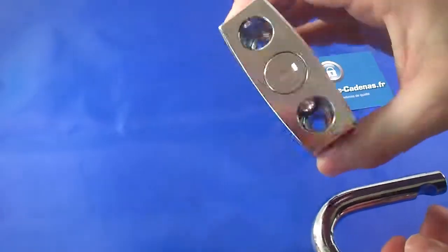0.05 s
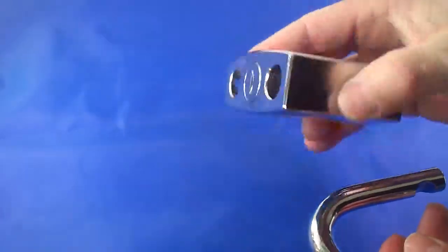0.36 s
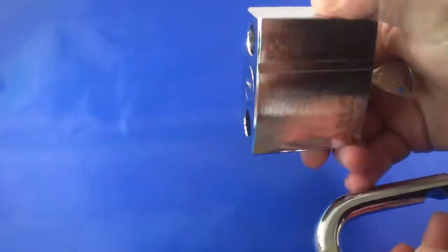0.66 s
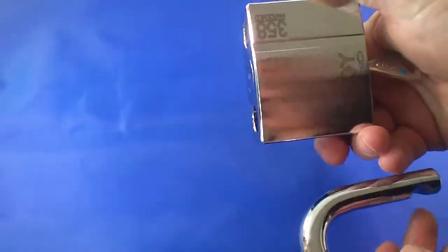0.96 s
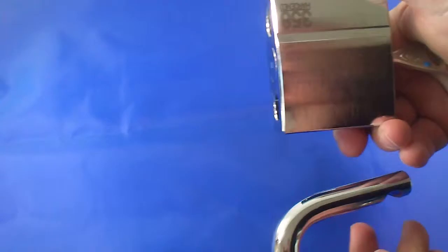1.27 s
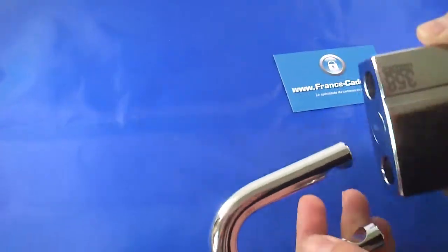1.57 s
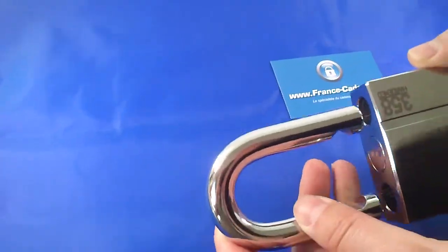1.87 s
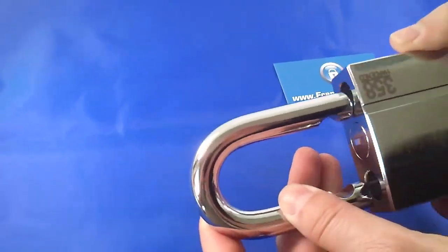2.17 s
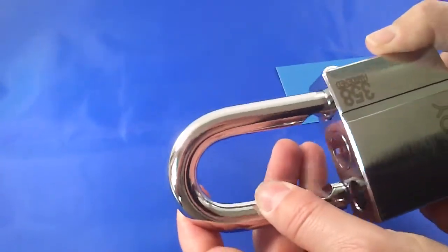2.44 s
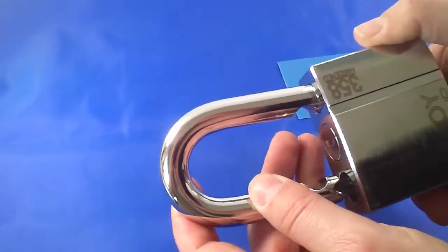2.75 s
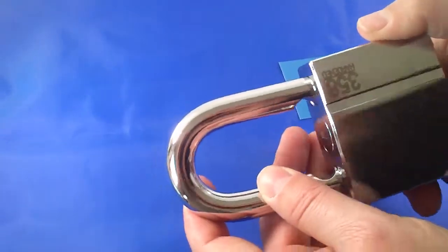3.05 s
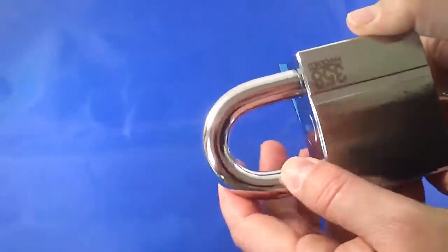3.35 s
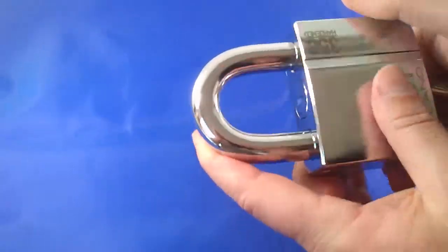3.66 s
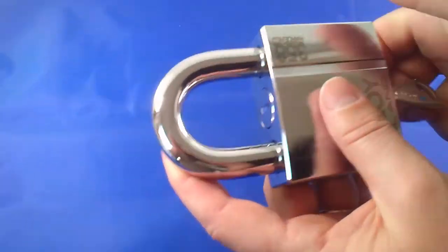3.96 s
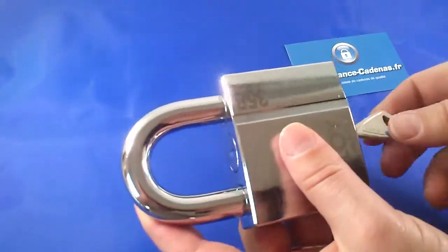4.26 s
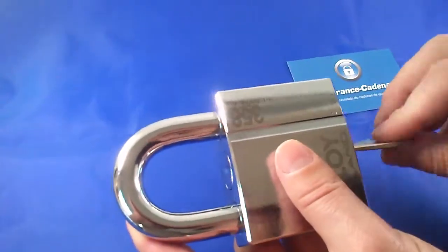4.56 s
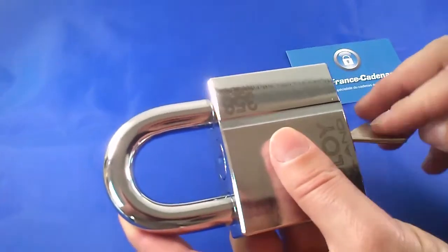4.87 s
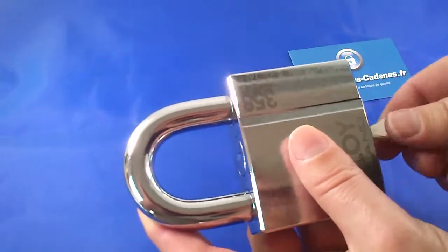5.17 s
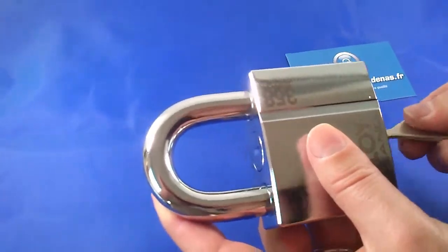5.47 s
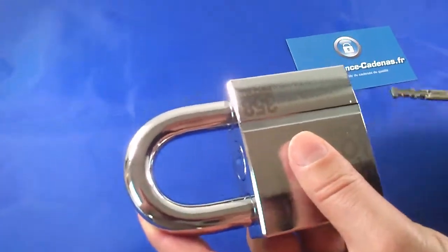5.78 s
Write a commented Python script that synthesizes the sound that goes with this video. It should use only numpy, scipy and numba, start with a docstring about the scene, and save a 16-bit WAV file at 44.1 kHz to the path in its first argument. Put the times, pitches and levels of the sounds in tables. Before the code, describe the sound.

A steel padlock clinks and grinds as its shackle snaps loudly shut, then a key scrapes faintly in the lock.

```python
"""A heavy steel padlock is handled close to a stereo microphone in a small room with faint hiss and hum.
Hands bump softly and the loose works tick. From 2 s the shackle clinks on the body, grinds into
its holes and, at 3.4 s, snaps home. The snap overloads the recorder, whose gain then creeps back.
From 4 s a key scrapes and taps in the keyway and rings thinly as it is drawn out."""
import sys
import numpy as np
from scipy import signal
from scipy.fft import rfft, irfft
from scipy.io import wavfile
from numba import njit

SR = 44100
rng = np.random.default_rng(int(sys.argv[2]) if len(sys.argv) > 2 else 0)


def log_audio(samples):
    """Write samples as a 16-bit WAV file to the path given in sys.argv[1]."""
    # one column per channel
    frames = np.atleast_2d(samples).T
    # limit to full scale, then quantise
    limited = np.clip(frames, -1, 1)
    pcm = np.round(limited * 32767).astype(np.int16)
    wavfile.write(sys.argv[1], SR, pcm)


N = 256662
TIME_S = np.arange(N) / SR
SHORT_S = TIME_S[:SR // 2]

# steel-on-steel grinding spectrum: freq_hz, relative_db
GRIND_SPECTRUM = [(300, -44.5), (900, -35), (1400, -10), (2200, -4.5), (2700, -5.5), (4900, 7.5),
                  (6800, -8.5), (8500, 2.5), (9600, -25.5), (10500, -15), (11600, -33), (13000, -6.5),
                  (14400, -14), (16000, -38)]
# shackle stage boundaries: free_until_s, seated_after_s
STAGE_EDGES_S = [2.15, 3]


def undb(db):
    """Decibels to gain."""
    return 10 ** (np.asarray(db) / 20)


def unit(x):
    """Scale to rms 1."""
    return x / np.sqrt(np.mean(x ** 2))


def fade(time_s, t60_s):
    """Exponential decay."""
    return np.exp(-np.log(1000) * time_s / t60_s)


def add(track, start_s, sound):
    """Mix a sound into the track."""
    start = int(start_s * SR)
    track[start:start + len(sound)] += sound[:N - start]


def colour(x, spectrum, tilt_db_oct=0, size=4096):
    """Minimum-phase filter through (freq_hz, gain_db) points, tilted above 2 kHz."""
    octave = np.log2(np.maximum(np.fft.rfftfreq(size, 1 / SR), 1))
    freq_hz, gain_db = np.transpose(spectrum)
    tilt_db = tilt_db_oct * np.clip(octave - np.log2(2000), 0, None)
    cepstrum = irfft(np.log(undb(np.interp(octave, np.log2(freq_hz), gain_db) + tilt_db)))
    cepstrum[1:size // 2] *= 2
    cepstrum[size // 2 + 1:] = 0
    return signal.oaconvolve(x, irfft(np.exp(rfft(cepstrum))))[:len(x)]


def noise(spectrum, size):
    """Coloured noise, rms 1."""
    return unit(colour(rng.standard_normal(size), spectrum))


def crack(spectrum, t60_s, tilt_db_oct=0, size=2048):
    """Dense, heavily damped contact modes: a noise burst starting near rms 1."""
    envelope = fade(TIME_S[:size], t60_s)
    burst = colour(rng.standard_normal(size) * envelope, spectrum, tilt_db_oct)
    return burst * np.linalg.norm(envelope) / np.linalg.norm(burst)


def ring(modes, tilt_db_oct=0, scatter_db=0.1):
    """Decaying modes starting near rms 1; each contact weights them slightly differently."""
    pitch_hz, mode_db, t60_s = np.transpose(modes)
    gain = undb(mode_db + tilt_db_oct * np.log2(pitch_hz) + scatter_db * rng.standard_normal(len(modes)))
    phase = 2 * np.pi * (pitch_hz[:, None] * SHORT_S + rng.random((len(modes), 1)))
    attack = 1 - np.exp(-SHORT_S / .0002)
    waves = np.sin(phase) * fade(SHORT_S, t60_s[:, None]) * attack
    return np.sqrt(2) * gain @ waves / np.linalg.norm(gain)


def slips(length_s, rate_hz, spread_db, sag_db=0, crowding=1):
    """Force of uneven tiny blows that weaken by sag_db; crowding over 1 speeds them up as they go."""
    force = np.zeros(max(int(length_s * SR), 2))
    count = int(length_s * rate_hz) + 2
    jitter, size_db = rng.random(512)[:count], spread_db * rng.standard_normal(512)[:count]
    progress = ((np.arange(count) + jitter) / count) ** (1 / crowding)
    force[(progress * len(force)).astype(int)] = undb(size_db - sag_db * progress)
    return force


def stroke(length_s, swell_db, rate_hz, spread_db, crest_share=.7, ease_db=5):
    """Stick-slip force of a hand push: swells to a crest, then eases."""
    force = slips(length_s, rate_hz, spread_db)
    progress = np.linspace(0, 1, len(force))
    return force * undb(np.interp(progress, [0, crest_share, 1], [-swell_db, 0, -ease_db]))


def rub(force, response):
    """Resonator driven by a force; energy equals rms 1 over the force's length."""
    sound = signal.fftconvolve(force, response)
    return sound * np.sqrt(len(force)) / np.linalg.norm(sound)


def background(hiss_db=(-52, -59), hum_hz=196, hum_db=-64):
    """Steady hiss, partly common to both sides, and a faint wavering hum."""
    # hiss spectrum: freq_hz, relative_db
    hiss_spectrum = [(15, -23), (25, 2.5), (126, -15), (198, -13.5), (227, -19), (359, -23.5), (631, -23.5),
                     (722, -27.5), (1240, -24.5), (1490, -27), (1900, -26), (2920, -32.5), (5280, -26.5),
                     (8580, -45.5), (15500, -35.5)]
    common = 0.69 * noise(hiss_spectrum, N)
    drift = np.interp(TIME_S, np.linspace(0, TIME_S[-1], 40), rng.standard_normal(40))
    hum = np.sqrt(2) * np.sin(2 * np.pi * hum_hz * TIME_S) * (1 + 0.45 * drift)
    hiss = [undb(side_db) * unit(common + noise(hiss_spectrum, N)) for side_db in hiss_db]
    return np.array(hiss) + undb(hum_db) * hum * np.array([[1], [.45]])


def hands(hold_db=-62):
    """Handling rumble that swells with each move, plus padded knocks."""
    # hand moves: centre_s, width_s, level_db
    moves = [(.15, 0.085, -47.5), (1.6, .45, -46.5), (5.8, 0.39, -55.5)]
    # bumps of hand on lock: start_s, thud_hz, thud_db, knock_db
    bumps = [(0.236, 35, -36.5, -75), (1.792, 50, -36.5, -36.5), (1.805, 49.3, -15, -30),
             (2.007, 32, -31.5, -62), (2.2, 29.8, -26, -54), (2.382, 64.6, -39, -38.5),
             (3.432, 115, -27.5, -25), (3.443, 220, -31, -30.5)]
    # dull knock spectrum: freq_hz, relative_db
    knock_spectrum = [(100, 5.5), (330, -11), (550, 3), (750, -2.5), (1000, -8), (2000, -26), (5000, -33.5),
                      (15000, -39)]
    swells = sum(undb(level_db) * np.exp(-((TIME_S - centre_s) / width_s) ** 2)
                 for centre_s, width_s, level_db in moves)
    rumble = noise([(20, -2), (60, -4.5), (130, -15), (400, -38), (3000, -82)], N)
    out = rumble * (undb(hold_db) + swells)
    for start_s, thud_hz, thud_db, knock_db in bumps:
        thud = np.sin(2 * np.pi * thud_hz * SHORT_S) * fade(SHORT_S, t60_s=0.1)
        add(out, start_s, undb(thud_db) * thud)
        add(out, start_s, undb(knock_db) * crack(knock_spectrum, t60_s=0.035))
    return out


def loose_works(ring_over_click_db=2.5, ring_t60_s=.014):
    """Locking balls and springs drop on their seats, each with a click and a brief pitch."""
    # drops inside the body: start_s, click_db, pitch_hz, tilt_db_oct
    ticks = [(0.393, -25.5, 4680, -1), (0.4369, -28.5, 4850, 1), (.4400, -26, 2590, -4.5),
             (0.4533, -30.5, 5230, -4), (1.7929, -42, 5540, 9), (2.541, -16, 3270, -1),
             (2.5454, -21.5, 6420, 9.5), (2.601, -42, 4440, 1), (2.7224, -21.5, 4810, -3),
             (2.726, -21.5, 6090, 6.5), (3.394, -12, 5680, -0.5)]
    # small-part click spectrum: freq_hz, relative_db
    tick_spectrum = [(300, -33.5), (900, -17), (1500, -3.5), (2400, 3.5), (3600, -6), (4900, 8.5),
                     (7500, -14.5), (10500, -15.5), (13500, -13.5), (16000, -20.5)]
    out = np.zeros(N)
    for start_s, click_db, pitch_hz, tilt_db_oct in ticks:
        add(out, start_s, undb(click_db) * crack(tick_spectrum, t60_s=0.021, tilt_db_oct=tilt_db_oct))
        add(out, start_s, undb(click_db + ring_over_click_db) * ring([(pitch_hz, 0, ring_t60_s)]))
    return out


def shackle_modes(time_s):
    """Modes of the free, touching or seated bow; seating raises them slightly and mutes the lowest."""
    # bow resonances: free_hz, seated_hz
    pitches = [(2204, 2290), (4005, 4010), (7662, 7709), (8195, 8215), (10090, 10096), (10520, 10555),
               (12660, 12785), (13302, 13305), (14330, 14350)]
    # their weights and decay: free_db, touching_db, seated_db, t60_s
    weights = [(-9, 8, -13.5, 0.027), (0.5, -5, -18, 0.29), (-13.5, -10.5, -6.5, 0.048),
               (-17, -35, -15, 0.096), (-23, -43, -21, 0.078), (-13, -15, -9, .09), (-17, -21, -18, 0.12),
               (-12, -5, 0.5, 0.12), (-42, -36, -35.5, .06)]
    stage = np.searchsorted(STAGE_EDGES_S, time_s)
    return [(pitch_hz[stage // 2], row[stage], row[-1]) for pitch_hz, row in zip(pitches, weights)]


def shackle_clinks(linger_db=-37.5, chatter_ring_db=-5.5, chatter_grind_db=-13.5):
    """Each blow cracks at the contact, rings the steel bow and bounces to rest on the body."""
    # shackle blows: start_s, ring_db, crack_db, ring_tilt_db_oct, bounce_s
    clinks = [(2.0055, -9, -13.5, 0.5, 0.047), (2.199, -43, -66, -5, .04), (2.2543, -32, -35, -0.5, .05),
              (2.4848, -30.5, -32, -3, 0.017), (2.5243, -29.5, -21, 6, .005), (3.107, -34, -23, 2, .005),
              (3.13, -31, -23.5, 4, .007), (3.1789, -19.5, -9.5, 0, .013), (3.312, -38, -21.5, -0.5, 0.013),
              (3.3619, -35.5, -18.5, 1.5, 0.0051), (3.4311, 8, 4, 1, .018), (3.4375, 11, -3, 12, .015),
              (3.984, -24, -26.5, -4, .013)]
    # steel impact spectrum: freq_hz, relative_db
    impact_spectrum = [(200, -25), (800, -22), (1400, -3), (2200, 8.5), (2900, 4), (4300, 11.5), (6500, -7),
                       (8300, -11), (11000, -22.5), (13300, -10), (16000, -29.5)]
    # added damping by fingers and body: free_t60_s, touching_t60_s, seated_t60_s
    grip_t60_s = [.4, .25, .13]
    out = np.zeros(N)
    for start_s, ring_db, crack_db, tilt_db_oct, bounce_s in clinks:
        stage = np.searchsorted(STAGE_EDGES_S, start_s)
        modes = shackle_modes(start_s)
        bow = ring(modes, tilt_db_oct)
        add(out, start_s, undb(ring_db) * bow * fade(SHORT_S, grip_t60_s[stage]))
        # a faint, longer ring escapes the damping
        long_modes = [(pitch_hz, mode_db, 3 * t60_s) for pitch_hz, mode_db, t60_s in modes]
        add(out, start_s, undb(ring_db + linger_db) * ring(long_modes, tilt_db_oct=-0.5))
        add(out, start_s, undb(crack_db) * crack(impact_spectrum, t60_s=.012))
        rebounds = slips(bounce_s, rate_hz=380, spread_db=0.9, sag_db=11.5, crowding=1.4)
        chatter_ring = rub(rebounds, bow * fade(SHORT_S, t60_s=.1))
        chatter_grind = rub(rebounds, crack(GRIND_SPECTRUM, t60_s=0.0085))
        add(out, start_s, undb(ring_db + chatter_ring_db) * chatter_ring)
        add(out, start_s, undb(crack_db + chatter_grind_db) * chatter_grind)
    return out


def shackle_grind(full_push_db=-21, rasp_db=-12, ring_db=-7, hardness=1.4):
    """The legs stick and slip in their holes: light force rasps dully, firm force grinds and rings."""
    # pushes on the shackle: start_s, length_s, relative_db, swell_db
    pushes = [(2.704, .018, -21, 12), (3.086, .084, -2, 21), (3.356, .072, -1, 9)]
    out = np.zeros(N)
    for start_s, length_s, relative_db, swell_db in pushes:
        force = stroke(length_s, swell_db, rate_hz=650, spread_db=2.2)
        # the rubbing contact damps the bow
        bow = ring(shackle_modes(start_s), tilt_db_oct=4) * fade(SHORT_S, t60_s=.03)
        rasp = rub(np.sqrt(force), crack(GRIND_SPECTRUM, t60_s=0.02, tilt_db_oct=-7))
        grind = rub(force ** hardness, crack(GRIND_SPECTRUM, t60_s=0.041, tilt_db_oct=0.5))
        add(out, start_s, undb(relative_db) * (undb(rasp_db) * rasp + grind))
        add(out, start_s, undb(relative_db + ring_db) * rub(force ** hardness, bow))
    return undb(full_push_db) * out


def key():
    """The key scrapes over the pins, taps in the keyway and rings thinly as it comes free."""
    # slides in the keyway: start_s, length_s, level_db, tilt_db_oct
    slides = [(3.974, .015, -32, -9), (4.477, .18, -60, -4), (4.956, .07, -53.5, 2),
              (5.504, 0.17, -53.5, -8.5)]
    # taps on the keyway: start_s, click_db, tilt_db_oct, ring_over_click_db
    taps = [(4.184, -37, 1, -15), (4.487, -36.5, -13.5, -2), (4.551, -44.5, -10, -14),
            (5.138, -48.5, -7, -15), (5.544, -43, -5, -7), (5.605, -40, -3, -15), (5.631, -36.5, -7, -7),
            (5.6344, -33, -6, -2), (5.658, -27, 7.5, 2.5), (5.664, -30.5, 1.5, -5.5)]
    # key contact spectrum: freq_hz, relative_db
    click_spectrum = [(400, -34), (1400, -14), (2400, -3), (3600, -7), (5600, 3.5), (8000, -11.5),
                      (10000, -7.5), (14000, 6), (16000, 2)]
    # key resonances: pitch_hz, relative_db, t60_s
    modes = [(2375, -19, 0.036), (5670, -8, 0.025), (15800, -10.5, 0.039)]
    out = np.zeros(N)
    for start_s, length_s, level_db, tilt_db_oct in slides:
        force = stroke(length_s, swell_db=12, rate_hz=400, spread_db=5.5)
        scrape = rub(force, crack(click_spectrum, t60_s=0.012, tilt_db_oct=tilt_db_oct))
        add(out, start_s, undb(level_db) * scrape)
    for start_s, click_db, tilt_db_oct, ring_over_click_db in taps:
        add(out, start_s, undb(click_db) * crack(click_spectrum, t60_s=0.024, tilt_db_oct=tilt_db_oct))
        add(out, start_s, undb(click_db + ring_over_click_db) * ring(modes, tilt_db_oct))
    return out


def room(x, gap_s=0.012, build_s=0.0035, split_hz=6000):
    """Diffuse wall echo; both bands decay at nearly the same rate."""
    # echo spectrum: freq_hz, relative_db
    echo_spectrum = [(100, -11.5), (1000, 4.5), (2000, 2.5), (4500, 5), (8000, -3.5), (13000, -11),
                     (16000, -9.5)]
    time_s = TIME_S[:SR]
    tail = noise(echo_spectrum, len(time_s))
    low = signal.sosfilt(signal.butter(2, split_hz, fs=SR, output="sos"), tail)
    high = signal.sosfilt(signal.butter(2, split_hz, "high", fs=SR, output="sos"), tail)
    onset = np.clip((time_s - gap_s) / build_s, 0, 1)
    response = (low * fade(time_s, t60_s=0.43) - high * fade(time_s, t60_s=0.45)) * onset
    return signal.fftconvolve(x, response / np.linalg.norm(response))[:N]


def scene(left_room_db=-22.5, right_room_db=-17.5, right_hands_db=-5):
    """The lock is near the left microphone port; each port gets its own echo and handling rumble."""
    # response of the right port, facing away from the lock: freq_hz, gain_over_left_db
    right_port = [(40, -3.5), (500, -6.5), (2200, -14.5), (4200, -20.5), (6500, -19), (8100, -2.5),
                  (10300, -15), (13200, -21), (16000, -33.5)]
    steel = shackle_clinks() + shackle_grind() + loose_works() + key()
    left = steel + hands() + undb(left_room_db) * room(steel)
    right = steel + undb(right_hands_db) * hands() + undb(right_room_db) * room(steel)
    return np.array([left, colour(right, right_port)]) + background()


@njit
def follow_peaks(x, attack_s, release_s):
    """Peak envelope follower."""
    out, level = np.empty(len(x)), 0.
    for i in range(len(x)):
        lag_s = attack_s if abs(x[i]) > level else release_s
        level += (abs(x[i]) - level) / (SR * lag_s)
        out[i] = level
    return out


def record(dry, threshold_db=-5.5, attack_s=0.0061, release_s=1.7, ratio=3, link=.05, top_hz=15900):
    """Gain ducks fast and recovers slowly, channels loosely linked; then clipping and a low-pass."""
    envelope = np.array([follow_peaks(x, attack_s, release_s) for x in dry])
    envelope += link * (envelope.max(axis=0) - envelope)
    compressed = dry / np.maximum(envelope / undb(threshold_db), 1) ** (1 - 1 / ratio)
    clipped = np.clip(compressed, -.92, .92)
    return signal.sosfilt(signal.ellip(8, .2, 70, top_hz, fs=SR, output="sos"), clipped)


dry = scene()
out = record(dry)
log_audio(out)
```